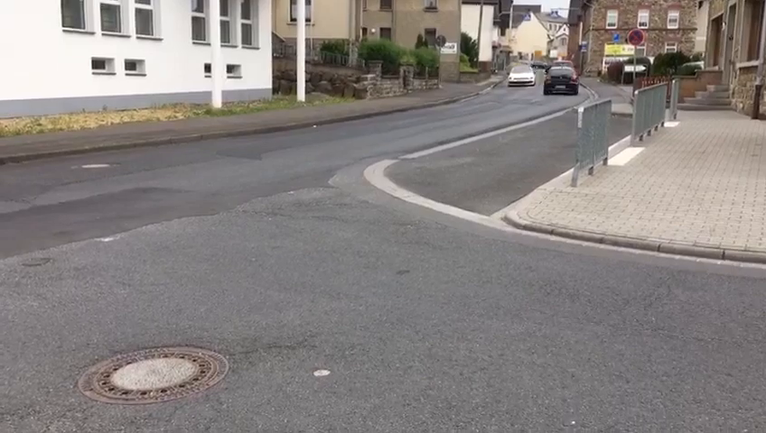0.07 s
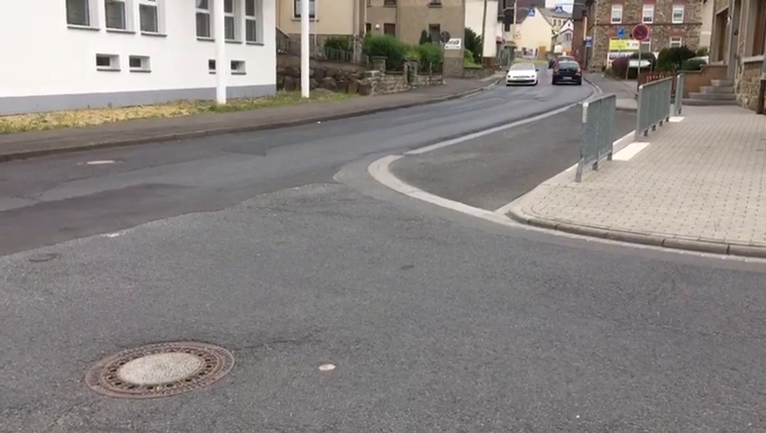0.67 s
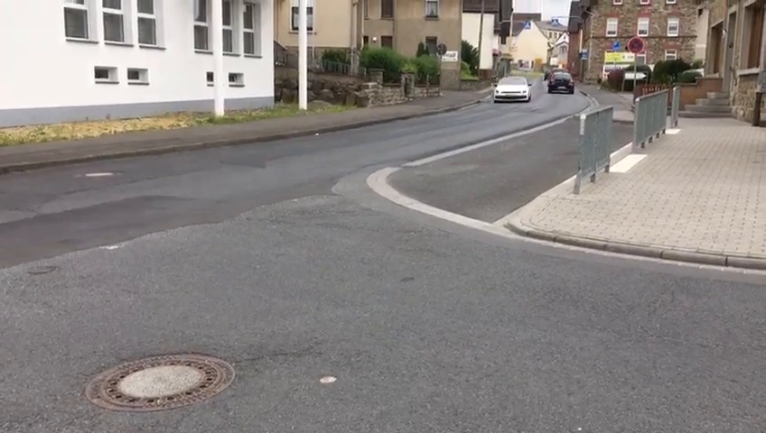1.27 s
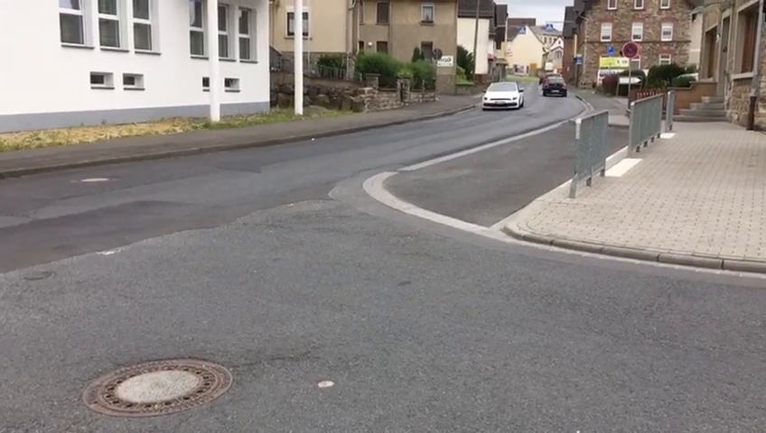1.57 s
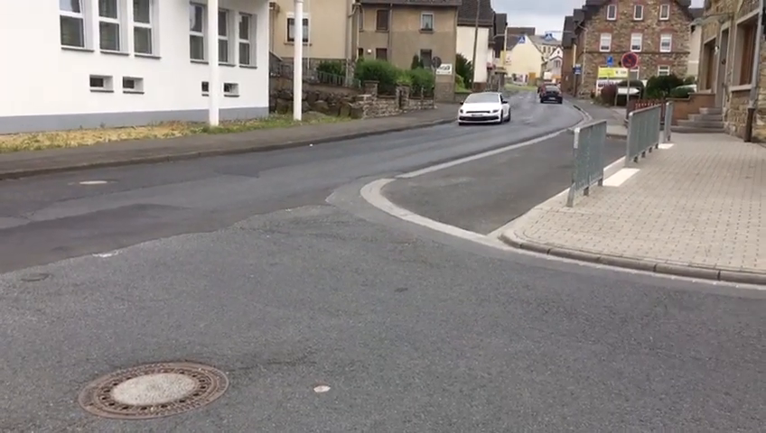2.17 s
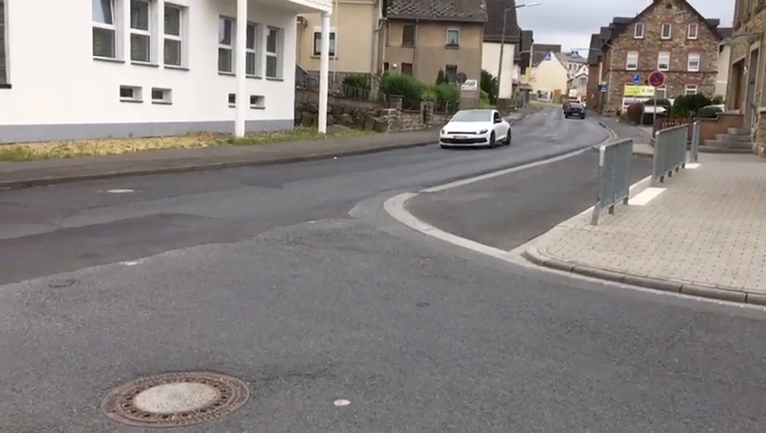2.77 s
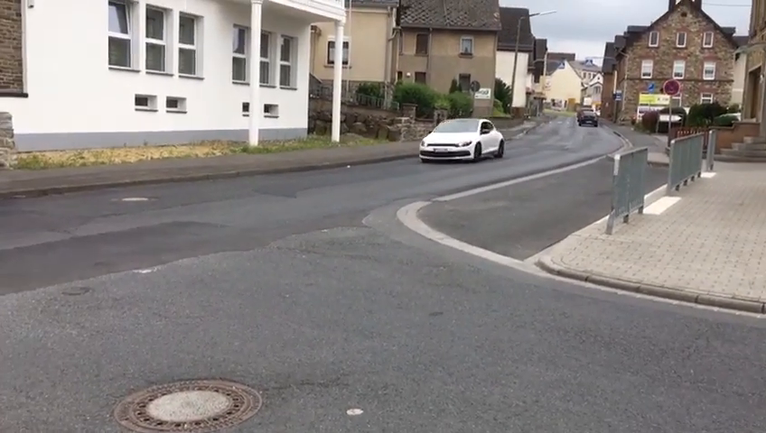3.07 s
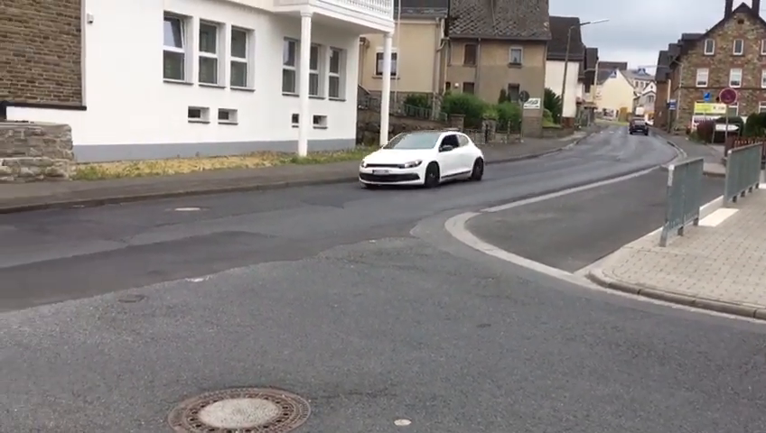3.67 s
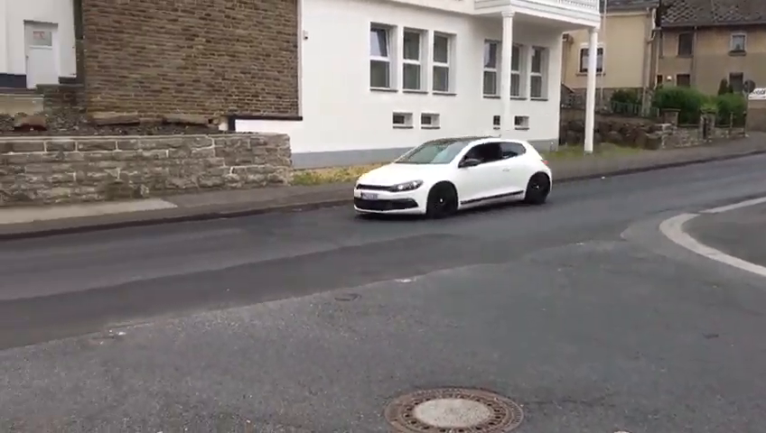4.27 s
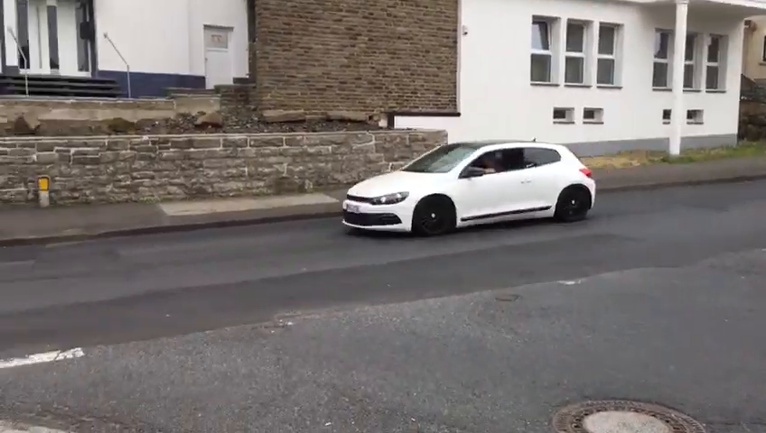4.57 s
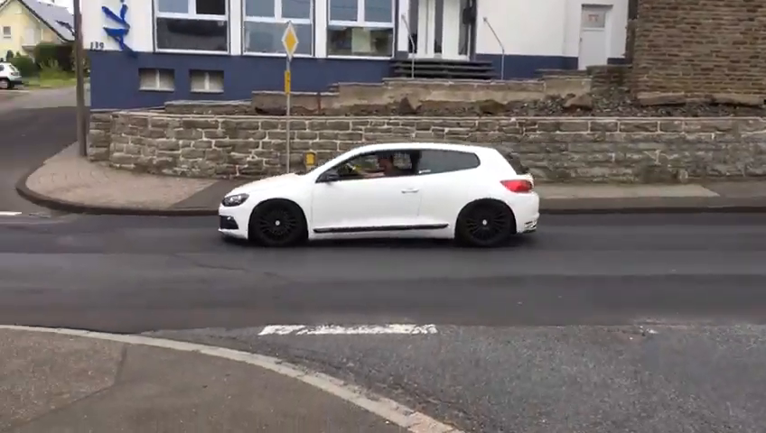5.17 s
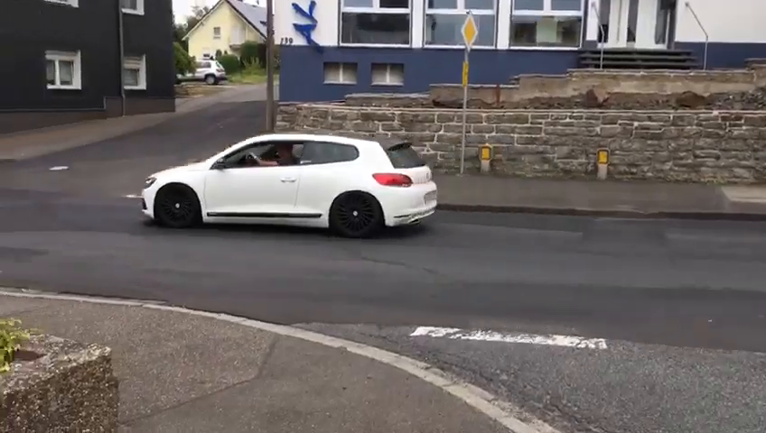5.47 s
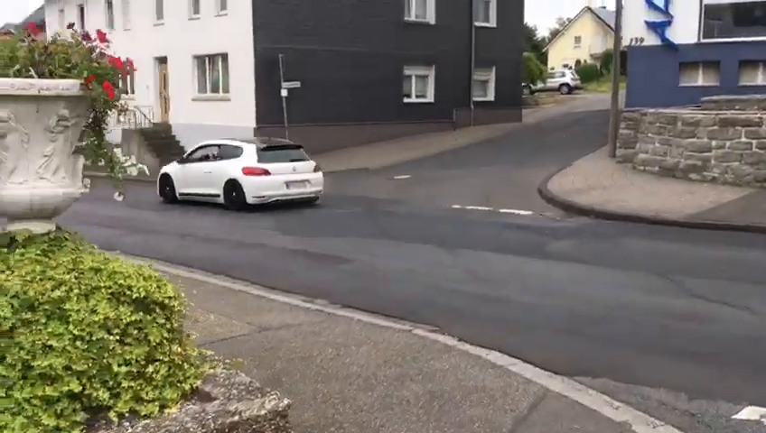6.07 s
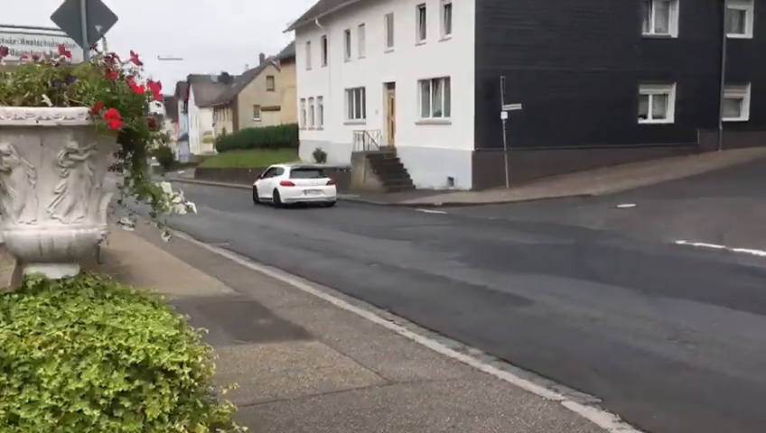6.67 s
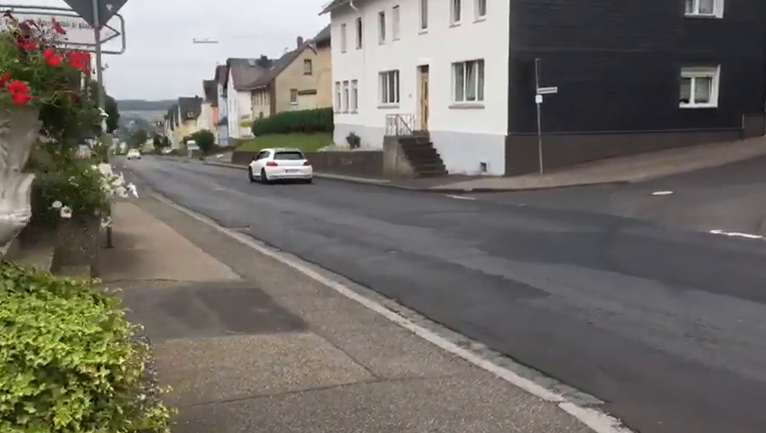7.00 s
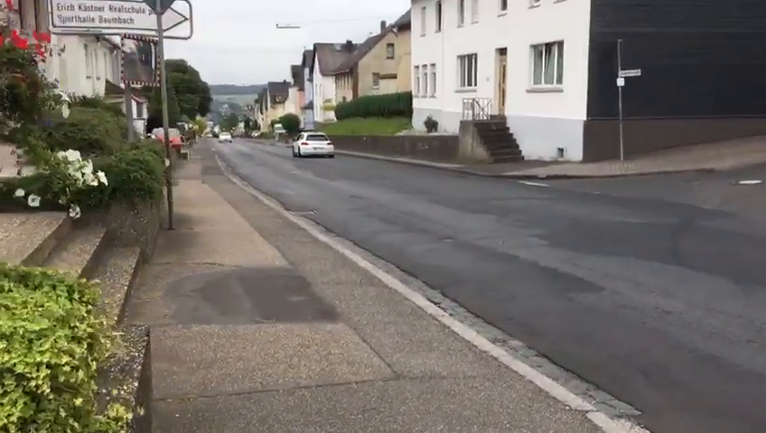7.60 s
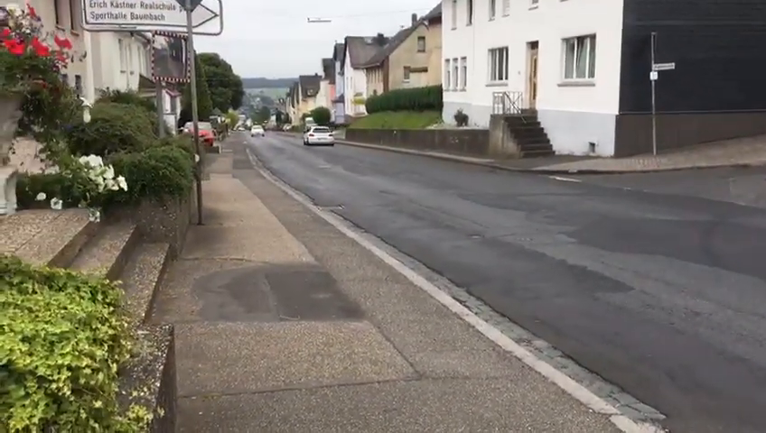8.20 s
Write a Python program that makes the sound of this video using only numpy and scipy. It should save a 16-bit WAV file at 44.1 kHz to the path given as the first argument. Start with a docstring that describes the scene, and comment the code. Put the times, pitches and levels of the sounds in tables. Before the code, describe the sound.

Heard from the roadside, a car's low exhaust hum and tyre noise draw nearer and swell as it goes past. The driver opens the throttle and the exhaust turns loud and raspy, climbing in pitch with a light echo between the houses. The sound cuts briefly for a gear change, then drops to a deep, booming drone over the roar of tyres as the car pulls away.

```python
"""Loud hatchback driving past

A four-cylinder car coasts up a street, passes close by and accelerates away, changing up once.
The lowest orders of its exhaust drone all along; once the rear faces the listener, the rasp of
firing pulses ringing the tailpipe opens up. Tyres roar and hiss on the asphalt, the belt drive
and turbocharger whistle faintly, and the house fronts echo the tailpipe."""
import sys
import numpy as np
from scipy import signal
from scipy.fft import rfft, irfft, next_fast_len
from scipy.io import wavfile
from scipy.ndimage import uniform_filter1d, minimum_filter1d, map_coordinates

SR = 44100
rng = np.random.default_rng(int(sys.argv[2]) if len(sys.argv) > 2 else 0)


def to_wav(s):
    """Save 16-bit WAV."""
    ch = np.atleast_2d(s).T  # columns
    pcm = np.round(np.clip(ch, -1, 1) * 32767)  # PCM
    wavfile.write(sys.argv[1], SR, pcm.astype(np.int16))


N = 367794
TIME = np.arange(N) / SR
PASS_S, SPEED_M_PER_S, CLOSEST_M = 4.82, 11.1, 8.5


def amp(db):
    """Decibels to gain."""
    return 10 ** (np.asarray(db) / 20)


def unit(x):
    """x at rms 1."""
    return x / np.sqrt(np.mean(x ** 2) + 1e-20)


def steady(x, span_s=0.089):
    """x levelled to a running rms of 1."""
    size = int(span_s * SR)
    power = uniform_filter1d(uniform_filter1d(x ** 2, size), size)
    return x / np.sqrt(np.abs(power) + 1e-12)


def along(points, hz):
    """Read (f/Hz, value) points at hz, on a log axis."""
    f, values = np.transpose(points)
    return np.interp(np.log(hz + 1), np.log(f + 1), values)


def curves(rows):
    """One automation curve for each column after the time."""
    times, *columns = np.transpose(rows)
    return [np.interp(TIME, times, column) for column in columns]


def after(at_s, width_s):
    """A soft step from 0 to 1 around at_s."""
    return .5 + .5 * np.tanh((TIME - at_s) / width_s)


def swell(at_s, width_s):
    """A bell of height 1 around at_s."""
    return np.exp(-np.minimum(((TIME - at_s) / width_s) ** 2, 20))


def dips(rows):
    """Decibels lost in bell-shaped dips."""
    return sum(db * swell(at_s, width_s) for at_s, db, width_s in rows)


def wobble(rate):
    """Smooth random modulation, rate knots a second."""
    knots = rng.standard_normal(int(N * rate / SR) + 4)
    coarse = TIME[::32]
    return np.interp(TIME, coarse, map_coordinates(knots, [coarse * rate]))


def coloured(x, spectrum):
    """x through a minimum-phase EQ drawn as (f/Hz, level/dB) points."""
    size = 2 * next_fast_len(N // 2 + SR // 4)
    gain = amp(along(spectrum, np.fft.rfftfreq(size, 1 / SR)))
    cepstrum = irfft(np.log(gain))
    cepstrum[1:size // 2] *= 2
    cepstrum[size // 2 + 1:] = 0
    return irfft(rfft(x, size) * np.exp(rfft(cepstrum)))[:N]


def rush(spectrum, patchy_db):
    """Coloured noise of rms 1, its gain mottled over time and frequency."""
    bins = signal.stft(rng.standard_normal(N), nperseg=512)[2]
    patches = uniform_filter1d(rng.standard_normal(bins.shape), size=5, axis=0)
    patches = unit(uniform_filter1d(patches, size=14, axis=1))
    noise = signal.istft(bins * amp(patchy_db * patches), nperseg=512)[1][:N]
    return unit(coloured(noise, spectrum))


def nearness():
    """Level in dB from spreading, 0 at the pass; between the houses a layer feels only a share of it."""
    return -20 * np.log10(np.hypot(1, SPEED_M_PER_S * (TIME - PASS_S) / CLOSEST_M))


def behind_bend():
    """Falls from 1 to 0 as the car rounds the bend and its treble comes into the open."""
    return 1 - after(1.46, .06)


# Engine pitch, Doppler shift included: t/s, f/Hz
FIRING_RATE = [(0, 100.3), (.5, 98.5), (1.5, 91), (3, 82.8), (4, 86.8), (4.8, 93.6), (5.2, 98.7),
               (5.75, 110.9), (6.24, 132.3), (6.75, 146), (7.17, 154.7), (7.48, 142.3), (7.65, 148.1),
               (7.86, 113.5), (8.34, 123.2)]
def firing_hz():
    """Cylinder firings per second, as the listener hears them."""
    return curves(FIRING_RATE)[0]


def crank(unsteady=.002):
    """Firings counted since the start; the speed is never quite even."""
    return np.cumsum(firing_hz() * (1 + unsteady * wobble(22))) / SR


# The pedal, opened on passing, eased for the gear change, opened again: t/s, opening/0-1
THROTTLE = [(4.3, 0.13), (4.85, .2), (5.2, 0.33), (5.4, 0.89), (5.95, 1), (6.5, 0.82), (7.16, 1),
            (7.23, 0.3), (7.58, 0.56), (7.7, 0), (7.88, 0.2), (7.96, 0.91), (8.34, 0.57)]
def throttle():
    """How far the throttle is open, 0-1."""
    return np.clip(curves(THROTTLE)[0], 0, 1)


# Fader ride of the boom: t/s, level/dB
BOOM_LEVEL = [(0, -22.5), (.7, -21.5), (1.25, -25.5), (1.75, -23.5), (2.42, -32), (2.6, -17), (2.98, -47),
              (3.22, -24), (3.68, -32), (3.87, -22.5), (4.35, -27), (4.95, -21.5), (5.38, -11.5),
              (5.75, -19), (7.45, -20.5), (7.72, -34), (7.85, -23.5), (8.34, -20)]
# Brief dips in the boom: t/s, depth/dB, half-length/s
BOOM_DIPS = [(.3, 6, 0.27), (1.9, 7, 0.049), (2.17, 17, 0.036), (2.74, 14, 0.013), (3.57, 17, 0.022),
             (4.84, 7.5, 0.036), (5.54, 6, 0.053), (6.23, 11, 0.069)]
# The exhaust cuts out for an instant as the gear changes: t/s, depth/dB, half-length/s
SHIFT_CUTS = [(7.2, 15.5, 0.018), (7.515, 18.5, .018)]
def boom(firings, flutter_db=1.82):
    """The exhaust's fundamental: a fluttering tone at the firing rate."""
    db = curves(BOOM_LEVEL)[0] - dips(BOOM_DIPS) - dips(SHIFT_CUTS) + flutter_db * wobble(21)
    return np.sqrt(2) * amp(db) * np.cos(2 * np.pi * firings)


# Fader ride of the drone, loudest as it crosses the silencer's resonance: t/s, level/dB
DRONE_LEVEL = [(0, -42), (.75, -40.5), (1.3, -32.5), (2.4, -32), (2.8, -41.5), (4.3, -35.5), (4.5, -29),
               (4.88, -27.5), (5.0, -18), (5.36, -31.5), (5.46, -18), (5.76, -17), (5.94, -13), (6.27, -31),
               (7.7, -41.5), (7.79, -17), (8.04, -13), (8.34, -17)]
def drone(firings):
    """The second order, an octave above the boom; it wavers more while coasting."""
    flutter_db = 2.32 + 0.5 * (1 - throttle())
    db = curves(DRONE_LEVEL)[0] + flutter_db * wobble(18)
    return np.sqrt(2) * amp(db) * np.sin(4 * np.pi * firings)


# Tone of the low-end bed: f/Hz, level/dB
RUMBLE_EQ = [(15, -20.5), (30, -3.5), (45, 4.5), (65, 6), (90, 7), (130, -2), (250, -67.5)]
def rumble(base_db=-25, boom_share=0.46, throttle_db=1, lug_db=6):
    """Low noise that follows the boom and the throttle, and swells as the higher gear takes up."""
    db = base_db + boom_share * curves(BOOM_LEVEL)[0] + throttle_db * throttle() + lug_db * swell(8, 0.31)
    return amp(db) * steady(rush(RUMBLE_EQ, patchy_db=-0.5), span_s=0.22)


# Fader ride of the rolling noise, before each layer's trim: t/s, level/dB
ROLLING_LEVEL = [(0, -42.5), (.55, -47.5), (2.7, -47), (4, -44), (4.55, -40), (5.3, -42.5), (5.95, -45),
                 (6.5, -44.5), (7.1, -47), (7.3, -39.5), (7.7, -35.5), (8.05, -38.5), (8.34, -39)]
# Body of the tread roar: f/Hz, level/dB
TREAD_EQ = [(50, -43), (110, 1), (230, 6), (340, -6), (480, -5), (680, -3), (860, -5), (1200, -3.5),
            (1450, -5.5), (1750, -6), (2300, -14.5), (3000, -36), (5000, -57)]
# Narrow resonance of the tread grooves: f/Hz, level/dB
GROOVE_EQ = [(700, -56), (890, 0.5), (980, 9.5), (1100, 6), (1250, -7.5), (1600, -53.5)]
# Broad wash of the tyres: f/Hz, level/dB
WASH_EQ = [(150, -32), (280, 10.5), (480, 3.5), (850, 7.5), (1300, -6.5), (2200, -3), (3100, -0.5),
           (4300, -3), (5500, -11), (7000, -29)]
# Airy hiss on top: f/Hz, level/dB
HISS_EQ = [(3500, -30.5), (5100, 1), (6200, 1), (7500, -5.5), (9500, -5), (10500, -13.5)]
def tyres(rear_boost_db=6, flare_db=4.5, throttle_db=3.5):
    """Tread roars on asphalt and its grooves ring, more so from behind; wash and hiss grow close by."""
    rolling_db, = curves(ROLLING_LEVEL)
    shade_db = -3 * after(6.4, 0.23) - 3 * behind_bend()
    grit = wobble(45)  # uneven asphalt flickers the treble
    roar = amp(rolling_db + 8.5 + 0.19 * wobble(15)) * rush(TREAD_EQ, patchy_db=1.9)
    groove_db = rolling_db + rear_boost_db * after(PASS_S, 0.34) + 0.4 * wobble(17)
    grooves = amp(groove_db) * rush(GROOVE_EQ, patchy_db=0.9)
    wash_db = -39 + 0.47 * nearness() + 0.49 * (rolling_db - rolling_db.mean()) + shade_db + .5 * grit
    wash = amp(wash_db) * rush(WASH_EQ, patchy_db=1.5)
    hiss_db = -47.5 + 0.78 * nearness() + shade_db + 0.44 * grit
    hiss_db += throttle_db * throttle() + flare_db * swell(5.93, 0.17)
    hiss = amp(hiss_db) * rush(HISS_EQ, patchy_db=1.7)
    return roar + grooves + wash + hiss


# Partials of the belt whine: f/firing rate, level/dB
BELT_PARTIALS = [(31.7, -56), (42, -69)]
def belt_whine(firings, waver_db=2, hidden_db=-13):
    """The belt drive whines in step with the engine, clearest while the nose is in view."""
    whine = sum(amp(db + waver_db * wobble(8)) * np.sin(2 * np.pi * order * firings + 1.3 * wobble(50))
                for order, db in BELT_PARTIALS)
    nose_in_view = 1 - after(5.5, .2)
    return whine * nose_in_view * amp(hidden_db * behind_bend())


# Pitch and fader ride of the turbocharger: t/s, f/Hz, level/dB
TURBO_RIDE = [(1.6, 4660, -69), (2.0, 4600, -60), (3.1, 4570, -61), (4.3, 4650, -53.5), (5.2, 5060, -74),
              (6.1, 5150, -56), (6.7, 5160, -59), (7.3, 4930, -92)]
def turbo_whistle(width_hz=30, waver_db=2):
    """The turbocharger whistles on one thin, unsteady tone."""
    hz, db = curves(TURBO_RIDE)
    phase = 2 * np.pi * np.cumsum(hz + width_hz * wobble(150)) / SR
    return amp(db + waver_db * wobble(15)) * np.sin(phase)


def tailpipe_level(full_db=-17.5, closed_db=-13, body_db=-17, far_db=-8):
    """Tailpipe fader in dB: it follows the throttle; the car's body shades it until it has passed."""
    shade_db = body_db * (1 - after(5.06, 0.46)) + far_db * (1 - after(4, .3))
    return full_db + closed_db * (1 - throttle()) + shade_db + 0.48 * nearness() - dips(SHIFT_CUTS)


# Resonances of the exhaust pipe: f/Hz, level/dB
PIPE_RESONANCES = [(340, -27), (395, -2.5), (425, -6), (470, -14.5), (520, -13.5), (555, -5.5), (585, -2),
                   (610, -2), (635, -7.5), (690, -15.5), (770, -35)]
# The middle orders that ring there: f/firing rate, level/dB
RINGING_ORDERS = [(3, -2), (4, -2), (5, 6.5)]
def pipe_ring(firings, pipe_db, flutter_db=2):
    """Clean engine orders swell as they sweep through the pipe's resonances."""
    ring = np.zeros(N)
    for order, trim_db in RINGING_ORDERS:
        db = pipe_db + trim_db + along(PIPE_RESONANCES, order * firing_hz()) + flutter_db * wobble(30)
        ring += amp(db) * np.sin(2 * np.pi * order * firings + 0.77 * wobble(25))
    return np.sqrt(2) * ring


# Reverb time between the house fronts: f/Hz, t60/s
STREET_DECAY = [(100, 0.82), (600, 0.44), (3000, 0.07)]
def street(x, wet_db, predelay_s=.025):
    """x with the echo of the house fronts, whose treble dies first."""
    hz, t, bins = signal.stft(rng.standard_normal(SR // 2), SR, nperseg=256)
    decay = amp(-60 * t / along(STREET_DECAY, hz)[:, None])
    tail = signal.istft(bins * decay, SR, nperseg=256)[1]
    tail = np.pad(tail / np.linalg.norm(tail), (int(predelay_s * SR), 0))
    return x + amp(wet_db) * signal.fftconvolve(x, tail)[:N]


# Breathy tone of the exhaust gas: f/Hz, level/dB
GAS_EQ = [(130, -27.5), (200, 8), (280, -4.5), (345, -30.5), (430, -32.5), (620, 5.5), (850, -10.5),
          (1020, -6.5), (1300, -8.5), (1700, -34), (3000, -61)]
def gas_puffs(firings, pipe_db, depth=.8, overrun_db=9):
    """Turbulent gas leaves in puffs, one per firing; it stands out more when the throttle is eased."""
    puffs = rng.standard_normal(N) * (1 + depth * np.cos(2 * np.pi * firings))
    db = pipe_db - 10.5 + overrun_db * (1 - throttle())
    return amp(db) * unit(street(coloured(puffs, GAS_EQ), wet_db=-12))


# The cylinders grow unequal as the revs climb: firing rate/Hz, imbalance/0-1
IMBALANCE = [(105, .14), (122, .3), (138, .62), (155, .72)]
# The four cylinders in firing order, at an imbalance of 1: excess size/pulse, lateness/firing periods
CYLINDERS = [(.6, .05), (-.4, -.035), (.25, .015), (-.45, -.05)]
def pulses(firings, jitter=0.081):
    """One pressure pulse per firing: uneven at high revs, sputtering when the throttle is eased."""
    imbalance = along(IMBALANCE, firing_hz())
    scatter = imbalance * (.22 + .25 * (1 - throttle()))
    count = np.arange(1, int(firings[-1]))
    at = np.searchsorted(firings, count)
    excess, late = np.array(CYLINDERS)[count % len(CYLINDERS)].T
    size_noise, timing_noise = rng.standard_normal((len(count), 2)).T
    sizes = 1 + imbalance[at] * excess + scatter[at] * size_noise
    onsets = np.searchsorted(firings, count + imbalance[at] * late + jitter * scatter[at] * timing_noise)
    return np.bincount(onsets, sizes, N + 1)[:N]


# Throaty middle of the rasp: f/Hz, level/dB
THROAT_EQ = [(240, -60), (300, -13), (355, -19), (425, 2), (490, -3), (555, -1), (625, 1), (700, -3),
             (780, -14), (1000, -30), (1500, -60)]
# Bright edge of the rasp: f/Hz, level/dB
BLARE_EQ = [(450, -39), (650, -9), (790, 8.5), (880, 1.5), (1000, -2), (1200, -3.5), (1450, -13),
            (2000, -35.5), (3500, -65.5)]
def rasp(firings, pipe_db, blare_db=-14, beam_db=11, side_db=-4):
    """The pulses ring the pipe; their brighter blare peaks while it points at the listener."""
    fifth_order = 2 * np.gradient(firings) * np.cos(5 * 2 * np.pi * firings)
    train = pulses(firings) - fifth_order  # pipe_ring plays that order
    throat = steady(street(coloured(train, THROAT_EQ), wet_db=-12))
    blare = steady(street(coloured(train, BLARE_EQ), wet_db=-8))
    blare *= amp(blare_db + beam_db * swell(6.186, 0.28))
    db = pipe_db + side_db * (1 - after(5.8, 0.23))  # weaker from the side
    return amp(db) * (blare - throat)  # opposite in polarity to soften the peaks


def lope(firings, pipe_db, trim_db=-4, flutter_db=5.2):
    """Unequal cylinders add a tone halfway between boom and drone, growing with the revs."""
    gain = along(IMBALANCE, firing_hz()) ** 2 * amp(pipe_db + trim_db + flutter_db * wobble(8))
    return np.sqrt(2) * gain * np.cos(1.5 * 2 * np.pi * firings)


def scene():
    """The exhaust, rolling noise and whistles of one car, in mono."""
    firings, pipe_db = crank(), tailpipe_level()
    tones = boom(firings) + drone(firings) + pipe_ring(firings, pipe_db) + lope(firings, pipe_db)
    exhaust = tones + rasp(firings, pipe_db) + gas_puffs(firings, pipe_db)
    return (exhaust + rumble() + tyres() + belt_whine(firings) + turbo_whistle())[None]


def record(dry, start_s=.035, ceiling=.85, top_hz=10350):
    """The sound opens after a moment; a limiter eases the peaks and a steep low-pass cuts the top."""
    fade_in = np.clip((TIME - start_s) / .002, 0, 1)
    needed_gain = np.minimum(1, ceiling / (np.abs(dry) + 1e-9))
    limiter = uniform_filter1d(minimum_filter1d(needed_gain, size=441), size=441)
    size = next_fast_len(N + SR // 4)
    passband = np.fft.rfftfreq(size, 1 / SR) < top_hz
    return irfft(rfft(dry * fade_in * limiter, size) * passband, size)[..., :N]


dry = scene()
out = record(dry)
to_wav(out)
```